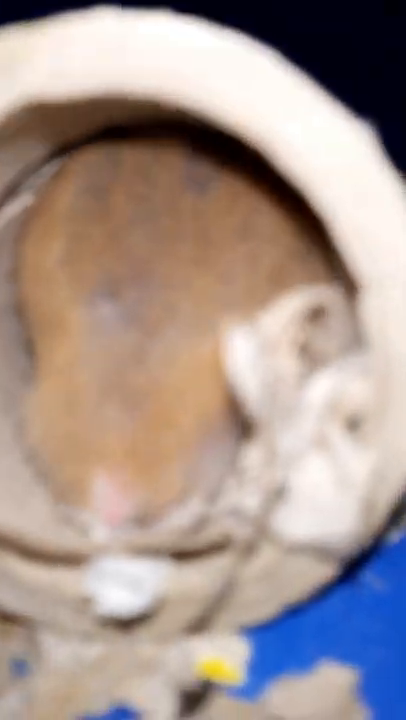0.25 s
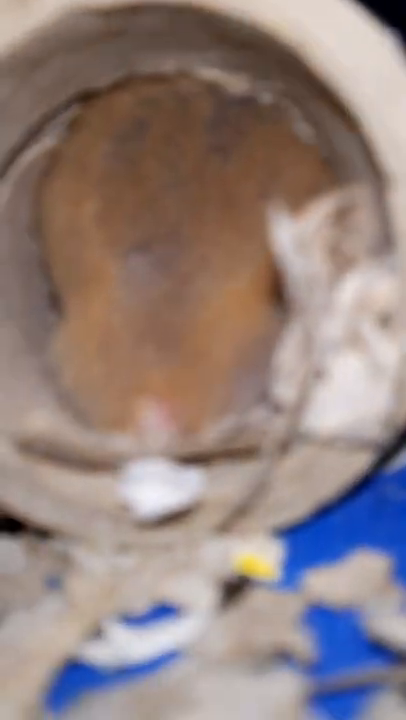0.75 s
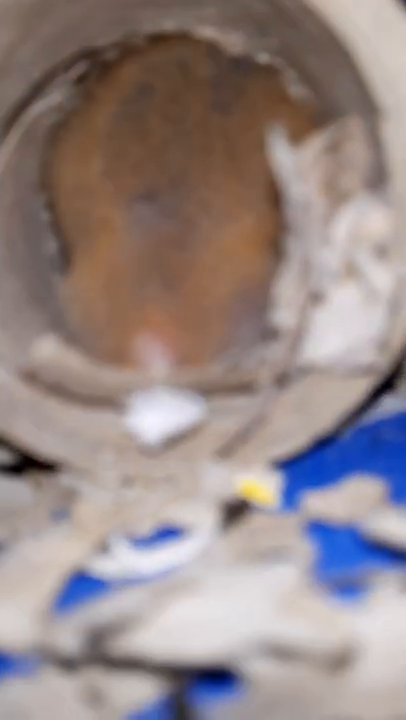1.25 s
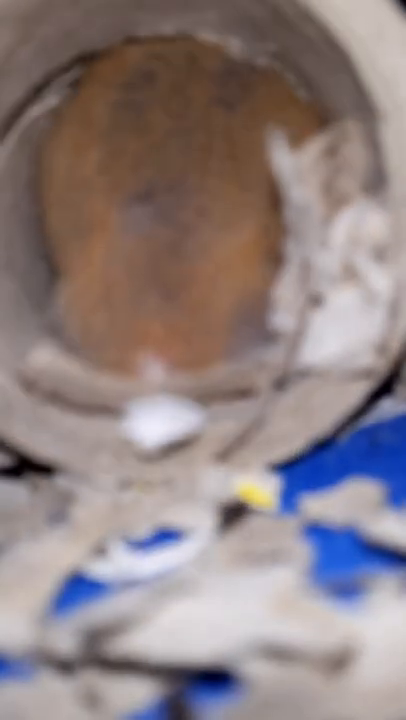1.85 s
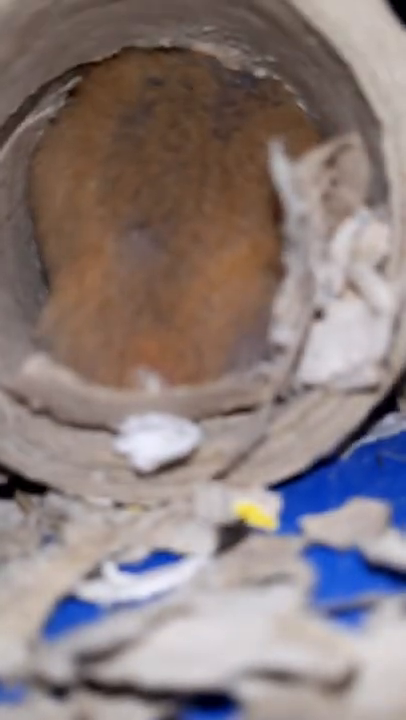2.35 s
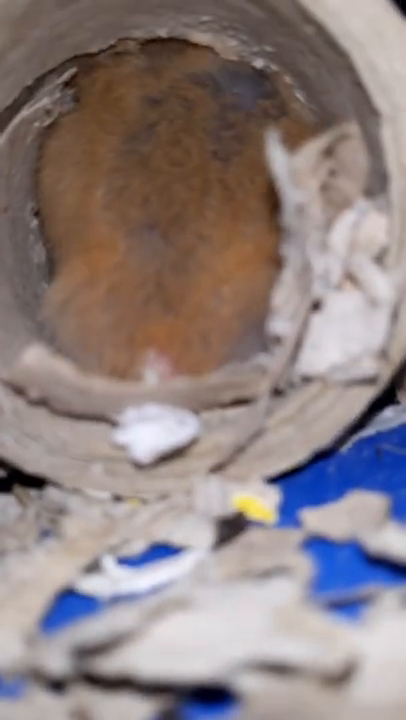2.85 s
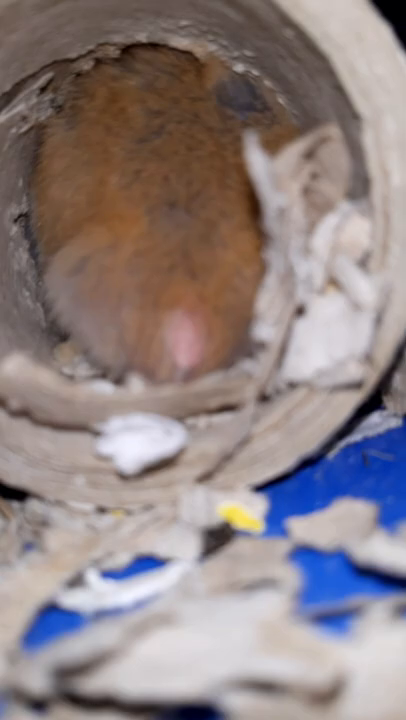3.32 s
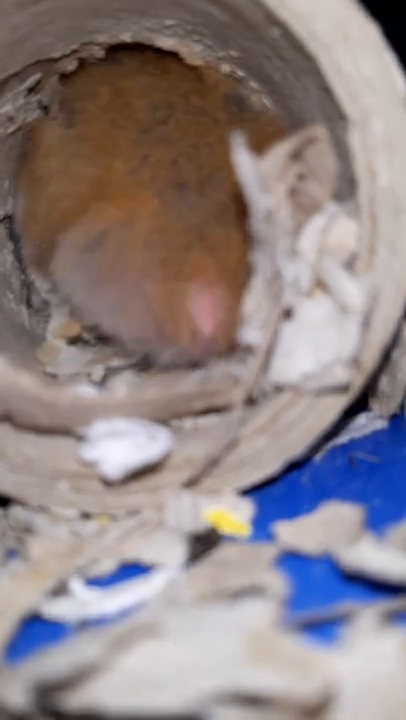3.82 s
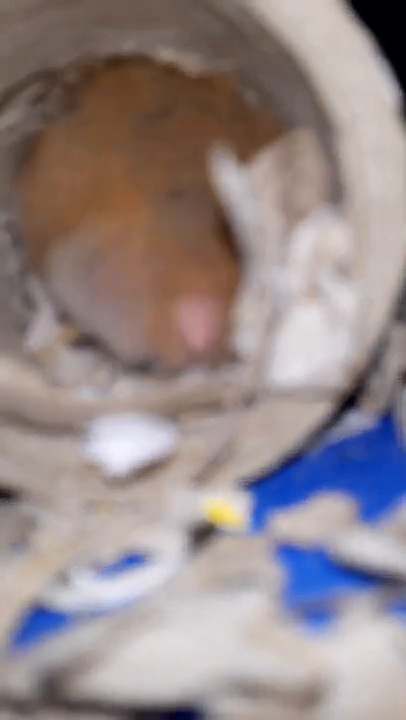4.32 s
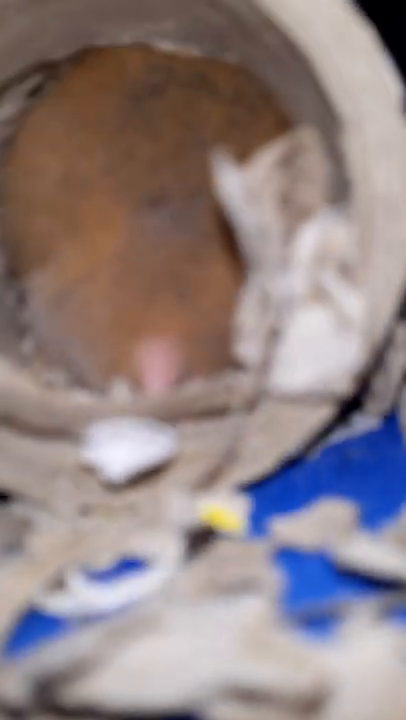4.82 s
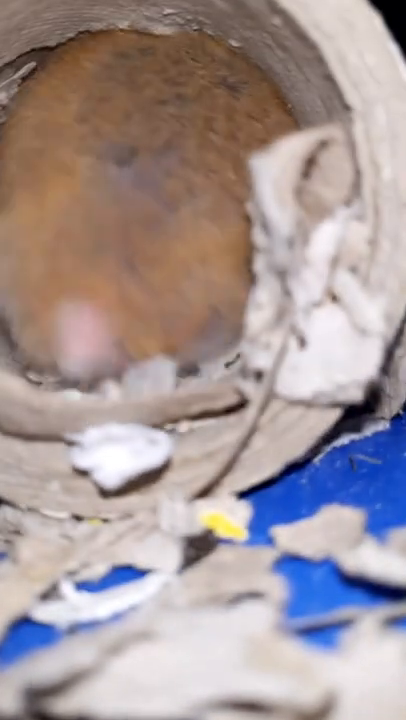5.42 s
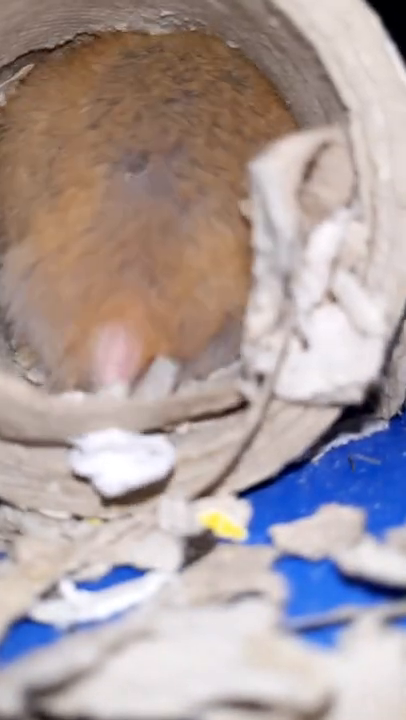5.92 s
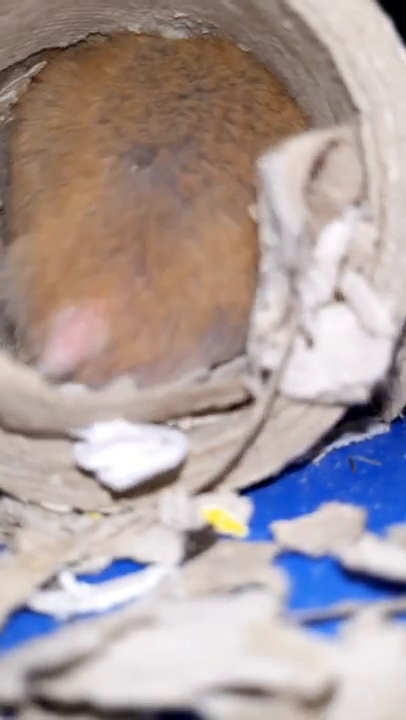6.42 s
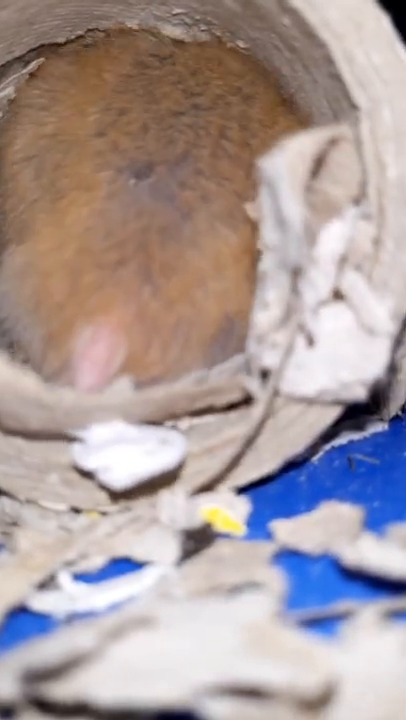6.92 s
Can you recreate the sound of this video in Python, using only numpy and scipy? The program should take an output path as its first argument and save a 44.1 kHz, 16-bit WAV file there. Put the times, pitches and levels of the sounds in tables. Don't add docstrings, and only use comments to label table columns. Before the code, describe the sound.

Bursts of papery rustling, claw taps and soft tube knocks from a burrowing rodent, easing into lighter scuffs over faint room hiss.

```python
import sys
import numpy as np
from scipy import signal
from scipy.fft import rfft, irfft, next_fast_len
from scipy.io import wavfile
from scipy.ndimage import uniform_filter1d

SR = 44100
rng = np.random.default_rng(int(sys.argv[2]) if len(sys.argv) > 2 else 0)


def wav_record(signal):
    frames = np.transpose(np.atleast_2d(signal))
    bounded = np.clip(frames, -1, 1)
    quanta = np.round(bounded * 32767).astype(np.int16)
    wavfile.write(sys.argv[1], SR, quanta)


def gain_from_db(level_db):
    decades = np.asarray(level_db, float) / 20
    return 10 ** decades


N = 315756

# (time [s], effort [dB])
LEANING = [(0.0, -103), (0.4, -84), (0.75, -74), (1.1, -79), (1.5, -84), (1.85, -72.5), (2.15, -64),
           (2.45, -70.5), (2.7, -62.5), (3.15, -63), (3.43, -61), (3.85, -76.5), (4.23, -64), (4.7, -86.5),
           (5.3, -80), (5.82, -69), (6.2, -75), (7.16, -68.5)]
# (frequency [Hz], width [Hz], level [dB])
WALL_MODES = [(197.4, 20.8, -9), (277.5, 21.8, -0.5), (363, 580, 3.5), (627.7, 25.5, -16)]
# (frequency [Hz], width [Hz], level [dB])
FLOOR_MODES = [(88.6, 52, -3.5), (139.4, 34, 3.5)]
# (frequency [Hz], width [Hz], level [dB])
BORE_MODES = [(630, 200, -10), (912, 47, -11), (1063, 101, 2), (1108, 45.6, 1), (1255.6, 34.5, -9.5),
              (1962, 44, -17)]
# (frequency [Hz], width [Hz], level [dB])
TRAY_MODES = [(321, 41, 5.5), (566, 120, 5), (634, 25, -3.5), (860, 290, 10.5), (986, 75, -4),
              (1294, 31, -14), (1930, 84, -31), (3040, 8100, -40)]


def evened(x):
    return x / np.sqrt(np.mean(x ** 2) + 1e-20)


def peak(x, db):
    return gain_from_db(db) * x / abs(x).max()


def read(points, hz):
    f, value = np.transpose(points)
    return np.interp(np.log(hz + 1), np.log(f + 1), value)


def add(mix, s, sound):
    start = round(s * SR)
    part = mix[..., start:start + sound.shape[-1]]
    part += sound[..., :part.shape[-1]]


def effort(rows, column):
    rows = np.vstack(rows)
    return gain_from_db(np.interp(np.arange(N) / SR, rows[:, 0], rows[:, column]))


def swell(s, db, rise, fade):
    coarse = np.arange(0, N, 32)
    since = coarse / SR - np.c_[s]
    slope = np.maximum(-since / np.c_[rise], since / np.c_[fade])
    gain = gain_from_db(np.c_[db] - 30 * slope).sum(0)
    return np.interp(np.arange(N), coarse, gain)


def strokes(column):
    # (time [s], paper [dB], fur [dB], fade [s])
    raking = [(0.0, -80.5, -100, 0.82), (0.62, -64.5, -49.5, 0.16), (0.815, -52, -46, 0.072),
              (1.3, -72, -107, 0.45), (2.019, -54.5, -56, 0.098), (2.84, -60.5, -62, 0.14),
              (2.985, -54.5, -61.5, 0.17), (3.4, -52.5, -56, 0.19), (3.7, -73, -68.5, 0.23),
              (3.94, -64.5, -64.5, 0.31), (4.221, -64, -64, 0.47), (4.545, -62.5, -65, 0.18),
              (4.731, -65.5, -71.5, 0.04), (5.188, -51, -46.5, 0.12), (5.461, -68, -61, 0.13),
              (5.81, -67, -62, 0.15), (6.378, -65.5, -67, 0.41), (7.137, -63.5, -63, 0.19)]
    # (time [s], paper [dB], fur [dB], fade [s], rise [s])
    kicking = [(0.408, -61, -48.5, 0.058, 0.014), (0.581, -49, -51, 0.022, 0.056),
               (0.928, -50.5, -49, 0.077, 0.013), (1.37, -51, -56.5, 0.073, 0.041),
               (1.671, -67, -57, 0.13, 0.0088), (2.13, -49.5, -57, 0.13, 0.04),
               (2.282, -41.5, -45.5, 0.094, 0.026), (2.5, -54, -57.5, 0.24, 0.04),
               (2.909, -72, -47, 0.0065, 0.0055), (3.153, -53.5, -59, 0.2, 0.034),
               (3.728, -54.5, -58.5, 0.072, 0.047), (4.159, -48.5, -43, 0.075, 0.0043),
               (5.718, -79, -62.5, 0.021, 0.0072), (5.85, -88, -69, 0.026, 0.024),
               (6.331, -70, -67, 0.28, 0.018), (6.033, -53.5, -52.5, .035, 0.017),
               (6.08, -46, -48.5, 0.057, 0.023), (6.709, -57, -42, 0.061, 0.0028),
               (6.888, -61, -61, 0.11, 0.0043)]
    rakes, kicks = np.transpose(raking), np.transpose(kicking)
    return (swell(rakes[0], rakes[column], 0.88 * rakes[3], rakes[3])
            + swell(kicks[0], kicks[column], kicks[4], kicks[3]))


def ring(x, modes):
    t = np.arange(3000) / SR
    body = 0
    for k, (hz, width, db) in enumerate(modes):
        decay = gain_from_db(db) * np.exp(-np.pi * width * t)
        body = body + (-1) ** k * decay * np.sin(2 * np.pi * hz * t)
    return signal.oaconvolve(x, body)


def grains(per_s, spread_db):
    size = gain_from_db(spread_db * np.minimum(rng.exponential(1, N), 4)) * rng.choice([-1., 1.], N)
    return size * (rng.random(N) < per_s / SR)


def blow(seconds, rough):
    t = np.arange(800) / SR / seconds
    return t * np.exp(1 - t) * (1 - rough + rough * rng.standard_normal(800))


def grit(seconds):
    return rng.standard_normal(1500) * np.exp(-np.arange(1500) / SR / seconds)


def wall():
    # (time [s], level [dB])
    thumps = [(0.53, -34), (0.546, -39), (0.5798, -30), (0.631, -15.5), (0.793, -31.5), (0.837, -27.5),
              (1.368, -57), (1.386, -40.5), (1.88, -41), (1.957, -38), (2.024, -27.5), (2.131, -38),
              (2.276, -31.5), (2.294, -20), (2.312, -34), (2.504, -33), (2.532, -35.5), (2.569, -42.5),
              (2.909, -29.5), (2.956, -36.5), (2.985, -44), (3.152, -32.5), (3.396, -30), (3.727, -33.5),
              (5.186, -38.5), (5.23, -36), (5.399, -48), (5.467, -34.5), (5.479, -52), (5.517, -54),
              (5.67, -49.5), (5.711, -43.5), (5.819, -42), (6.03, -45), (6.287, -44), (6.336, -39.5),
              (6.725, -44), (6.901, -41)]
    # (time [s], level [dB])
    shoves = [(0.365, -33.5), (0.406, -31.5), (0.516, -34), (0.738, -39), (0.919, -25), (0.949, -57),
              (1.844, -42.5), (2.085, -32.5), (2.15, -35), (2.492, -26), (2.708, -42), (2.764, -38),
              (3.129, -35.5), (3.324, -35.5), (3.349, -33.5), (3.478, -39.5), (3.619, -41.5),
              (3.677, -39.5), (3.878, -44), (4.08, -42.5), (4.104, -37.5), (4.155, -65), (4.308, -39),
              (4.88, -54.5), (4.932, -56), (5.968, -48), (6.085, -32.5), (6.385, -37.5), (6.712, -33),
              (6.8879, -31.5)]
    # (time [s], level [dB], fade [s])
    heaves = [(0.42, -55, 0.079), (0.761, -52, 0.18), (2.098, -59.5, 0.72), (3.36, -51, 0.13),
              (4.098, -59, 0.033), (4.33, -50.5, 0.15), (4.549, -69, 0.2), (4.9, -66.5, 0.063),
              (5.0, -64, 0.11), (5.518, -72, 0.094), (5.969, -61, 0.068), (6.15, -69, 0.17),
              (6.4, -55, 0.12), (6.731, -51, 0.043), (6.83, -53.5, 0.047), (6.91, -45, 0.048),
              (7.0, -71, 0.12)]
    drive = uniform_filter1d(grains(900, 2.88), 24)
    s, db = np.transpose(thumps + shoves)
    push = effort(LEANING, 1) + gain_from_db(-3) * strokes(2)
    push += swell(s, db - 18.5, 0.006, 0.064)
    cardboard = gain_from_db(2.5) * evened(ring(drive, WALL_MODES)[:N])
    floor = gain_from_db(-5.5) * evened(ring(drive, FLOOR_MODES)[:N])
    out = push * (cardboard + floor)

    s, db, fade = np.transpose(heaves)
    shifting = uniform_filter1d(grains(400, 0.81), 200)
    out += swell(s, db, fade, fade) * evened(ring(shifting, FLOOR_MODES)[:N])

    for rows, weight_db in (thumps, -24.5), (shoves, -13):
        for s, db in rows:
            grind = uniform_filter1d(blow(0.0045, 0.76) + 30 * np.gradient(blow(0.0011, 0)), 30)
            floor_db = 0.75 * (db + 35.5) - 34.5 + weight_db
            hit = peak(ring(grind, WALL_MODES), db - 3.5)
            add(out, s - .0012, hit + peak(ring(grind - grind.mean(), FLOOR_MODES), floor_db))
    return out


def claws():
    # (frequency [Hz], width [Hz], level [dB])
    mouth = [(1780, 650, -7), (2767, 255, -0.5), (2956, 233, -1), (3240, 370, -6.5), (6200, 93, -21.5)]
    # (frequency [Hz], width [Hz], level [dB])
    thud = [(487, 83, -11), (1810, 340, -6)]
    # (time [s], level [dB])
    knocks = [(0.4065, -39.5), (0.781, -45), (0.811, -30), (0.917, -44), (0.931, -39), (1.167, -52),
              (1.879, -51), (2.011, -49), (2.025, -34.5), (2.122, -39.5), (2.136, -37), (2.167, -41.5),
              (2.18, -47), (2.294, -25.5), (2.312, -34.5), (2.496, -39), (2.511, -33), (2.55, -43.5),
              (2.9835, -39), (3.149, -38.5), (3.37, -43), (3.785, -48), (4.118, -42), (5.598, -51.5),
              (6.709, -36), (6.714, -45), (6.897, -45)]
    # (time [s], level [dB])
    taps = [(0.5786, -23), (0.631, -17.5), (1.366, -68), (2.275, -31.5), (2.801, -50), (3.392, -33),
            (3.669, -49.5), (3.729, -35), (3.879, -46.5), (4.163, -32.5), (4.259, -46.5), (4.556, -42),
            (5.15, -47.5), (5.189, -39), (5.384, -52), (6.035, -56), (6.089, -51), (6.352, -57),
            (6.389, -58), (6.889, -47.5)]
    scrape = gain_from_db(-5) * effort(LEANING, 1) + gain_from_db(-1.5) * strokes(2)
    out = scrape * evened(ring(grains(2000, 2.4), BORE_MODES)[:N])
    out += strokes(2) * gain_from_db(-3.0) * evened(ring(grains(4000, 5.3), mouth)[:N])
    for rows, hard_db in (knocks, -13), (taps, -2.5):
        for s, db in rows:
            touch = np.pad(blow(.00006, 0), (0, 700), "edge")
            contact = grit(.0012) + .4 * grit(.012) + 3 * touch
            inside = peak(ring(contact, BORE_MODES + thud), db)
            add(out, s - .001, inside + peak(ring(contact, mouth), db + hard_db))
    return out


def paper():
    # (frequency [Hz], density [dB per Hz])
    spectrum = [(1500, 0), (2200, -19), (4300, -9), (6000, -6.5), (8300, -0.5), (10000, -4.5), (11700, -26),
                (14000, -9), (15400, -16), (15850, -43.5)]
    # (time [s], level [dB], length [s])
    swishes = [
        (1.16, -62, 0.028),
        (1.27, -71, 0.02),
        (1.501, -68, 0.028),
        (2.124, -63, 0.022),
        (2.779, -56.5, 0.034),
        (3.688, -57, 0.0078),
        (3.886, -63, 0.026),
        (5.528, -67.5, 0.012),
        (5.869, -69.5, 0.12),
    ]
    # (time [s], level [dB])
    snaps = [(0.4025, -45), (0.5788, -22), (0.629, -29), (0.7856, -43), (0.8165, -34.5), (0.9163, -47),
             (0.9308, -38), (2.0088, -35), (2.0238, -35.5), (2.1206, -38.5), (2.2707, -31.5),
             (2.2902, -38.5), (2.2967, -22.5), (2.3094, -39), (2.4907, -37.5), (2.5057, -37.5),
             (2.8035, -35.5), (2.8848, -32.5), (2.9024, -37.5), (3.3842, -23.5), (3.7279, -38.5),
             (4.5526, -31), (5.1452, -44), (5.1627, -41.5), (6.0831, -30.5), (6.349, -40)]
    # (time [s], level [dB])
    fibres = [(1.3578, -40), (1.365, -36), (1.6745, -55), (2.1384, -37), (2.1535, -37), (2.1784, -39),
              (2.1854, -35), (2.1984, -53), (2.9831, -33.5), (3.0054, -42), (3.1482, -31.5),
              (3.2076, -37.5), (3.256, -42), (3.4044, -28.5), (3.4531, -36.5), (3.6661, -42), (4.1609, -28),
              (4.5406, -45), (5.7129, -48), (6.0102, -54), (6.0277, -39.5), (6.0661, -42), (6.4283, -47),
              (6.7077, -39.5), (6.8867, -37), (7.1227, -52)]
    # (time [s], level [dB], pitch [Hz])
    flicks = [(0.5132, -55, 7660), (0.5325, -45, 6000), (0.778, -38, 6700), (0.936, -30.5, 6200),
              (1.086, -46, 9350), (1.275, -43, 8160), (1.3354, -53, 7110), (1.35, -41.5, 8900),
              (1.475, -64.5, 8560), (1.8775, -43, 8480), (1.9614, -58, 8320), (1.9779, -44, 8550),
              (2.085, -41, 8490), (2.354, -60, 8800), (2.7142, -55, 8110), (2.7263, -39.5, 8950),
              (2.7531, -45, 8110), (2.7574, -41, 8620), (2.9292, -40, 6740), (3.031, -48, 8900),
              (3.1864, -55, 8340), (3.3228, -57, 8660), (3.3653, -56, 7580), (3.51, -42, 8450),
              (3.671, -33, 9670), (3.7808, -51.5, 7710), (3.876, -43, 8450), (3.899, -47, 9640),
              (3.935, -39, 8480), (4.0896, -54, 8570), (4.2288, -45, 8680), (4.2877, -39, 9250),
              (4.3166, -49, 7640), (4.329, -43, 7300), (4.466, -45.5, 8290), (4.5056, -53, 9450),
              (4.8755, -56.5, 7990), (5.0893, -50, 6220), (5.1322, -49, 6140), (5.2195, -40, 6400),
              (5.3238, -51.5, 6090), (5.4151, -52, 8150), (5.4635, -49, 10100), (5.565, -49.5, 8300),
              (5.7478, -46, 7960), (5.803, -42, 8300), (5.858, -43, 6800), (5.8875, -58, 7810),
              (5.9594, -50.5, 8050), (6.283, -43, 6100), (6.325, -46, 6040), (6.3887, -41, 6000),
              (7.0632, -51, 8360)]
    size, t = next_fast_len(N), np.arange(N) / SR
    crackle = grains(7000, 4.2) + 2.0 * rng.standard_normal(N)
    clumps = gain_from_db(3.6 * evened(uniform_filter1d(rng.standard_normal(N), 450)))
    strays = signal.oaconvolve(grains(450, 5.5), grit(0.0004))[:N]
    bed = evened(crackle * clumps) + gain_from_db(-4.5) * evened(strays)
    colour = gain_from_db(read(spectrum, np.fft.rfftfreq(size, 1 / SR)))
    stir = strokes(1) * gain_from_db(1.0)
    for s, db, length in swishes:
        stir += gain_from_db(db) * np.exp(-((t - s) / length) ** 2)
    out = evened(irfft(rfft(bed, size) * colour, size)[:N]) * stir

    for rows, pitch_hz in (snaps, 6950), (fibres, 8480):
        band = signal.butter(2, [.6 * pitch_hz, 1.35 * pitch_hz], "band", fs=SR)
        for s, db in rows:
            tear = grit(0.00054) + 0.46 * grit(0.0022)
            add(out, s - .0005, peak(signal.lfilter(*band, tear) + 0.36 * tear, db + 0.5))
    for s, db, pitch_hz in flicks:
        band = signal.butter(2, [.72 * pitch_hz, 1.45 * pitch_hz], "band", fs=SR)
        add(out, s, peak(signal.lfilter(*band, grit(0.00068)), db - 3.0))
    return out


def brush():
    # (time [s], level [dB], rise [s], fade [s])
    brushes = [(.41, -60, .02, 0.082), (.572, -56, .05, .02), (.582, -46.5, .004, 0.077),
               (.633, -51, .004, 0.072), (.812, -56, .07, 0.084), (.935, -54.5, 0.024, 0.07),
               (1.678, -59.5, 0.0044, 0.091), (2.03, -60, .03, .08), (5.46, -71, 0.042, 0.07),
               (5.82, -68.5, .08, .08), (2.3, -50, .04, 0.089), (3.39, -63, 0.027, 0.064),
               (3.68, -65.5, .03, 0.18), (6.17, -64.5, 0.098, .08), (6.37, -70, 0.12, 0.12)]
    # (time [s], level [dB], rise [s], fade [s])
    scuffs = [
        (4.93, -58.5, 0.1, 0.18),
        (5.05, -67.5, .05, .2),
        (5.85, -59, .15, .15),
        (6.83, -62, .04, .12),
    ]
    band = signal.butter(2, [1290, 6000], "band", fs=SR)
    card = signal.lfilter(*band, grains(2500, 4.0))
    belly = ring(uniform_filter1d(grains(700, 5.0), 24), WALL_MODES)[:N]
    return swell(*np.transpose(brushes)) * evened(card) + swell(*np.transpose(scuffs)) * evened(belly)


def nicks():
    # (time [s], level [dB], pitch [Hz])
    contacts = [(1.9969, -53, 6480), (2.0837, -52, 2850), (2.1244, -50, 6290), (2.154, -45, 6290),
                (2.5104, -31, 2770), (2.7588, -51, 3990), (2.7634, -53, 5920), (2.7706, -44, 5900),
                (2.8524, -55, 6350), (2.9773, -46, 6290), (2.9814, -51, 2900), (3.3653, -50, 6200),
                (3.6666, -63, 2740), (3.6711, -58, 3110), (3.7045, -52, 3000), (3.7808, -59, 2810),
                (3.8754, -53, 3060), (3.8995, -54, 3070), (3.9407, -61, 2920), (3.9589, -56, 2910),
                (4.0864, -50, 3080), (4.2554, -43, 2910), (5.145, -38, 2810), (5.164, -38, 2800),
                (5.2195, -44, 2860), (5.3797, -57, 2960), (5.4156, -49, 2950), (5.4244, -64, 2580)]
    out = np.zeros(N)
    for s, db, pitch_hz in contacts:
        contact = grit(0.00041) + 0.247 * grit(0.004)
        spot = ring(contact, [(pitch_hz, 290, 0), (1955, 60, -16)])[:1500]
        add(out, s, peak(spot + 0.6 * contact, db - 4.5))
    return out


def pings():
    # (time [s], level [dB])
    raps = [
        (2.984, -49),
        (3.73, -38.5),
        (4.166, -36.5),
        (5.386, -54.5),
        (5.808, -53),
        (6.712, -32),
        (6.893, -43),
    ]
    out = np.zeros(N)
    for s, db in raps:
        contact = blow(0.00011, 0.2) + 0.17 * blow(0.0024, 0.88)
        add(out, s, peak(ring(contact, BORE_MODES[1:5]), db))
    return out


def glide():
    # (time [s], pitch [Hz], level [dB])
    path = [
        (4.88, 2340, -91),
        (4.93, 2350, -74.5),
        (5.01, 2400, -83),
        (5.06, 2850, -73.5),
        (5.2, 2830, -60),
        (5.28, 2650, -71.5),
        (5.37, 2530, -70.5),
        (5.53, 2480, -75),
        (5.6, 2440, -88),
    ]
    s, hz, db = np.transpose(path)
    t = np.arange(N) / SR
    flutter = uniform_filter1d(rng.standard_normal((2, N)), 150)
    turn = 2 * np.pi * np.cumsum(np.interp(t, s, hz)) / SR
    rub = flutter[0] * np.cos(turn) + flutter[1] * np.sin(turn)
    return gain_from_db(np.interp(t, s, db)) * evened(rub)


def skid(db):
    t = np.arange(4499) / SR
    hz = 856 + (1200 - 856) * np.exp(-t / 0.005)
    return gain_from_db(db) * np.exp(-t / 0.0034) * np.sin(2 * np.pi * np.cumsum(hz) / SR)


def tray():
    # (time [s], level [dB], left-right [dB], grind [s])
    bumps = [
        (1.674, -22.5, -0.5, 0.00028),
        (1.6775, -17, 2.5, 0.0003),
        (1.704, -35, 4.5, 0.000058),
        (1.738, -49, 3, 0.00033),
    ]
    # (time [s], level [dB])
    ticks = [
        (2.6118, -35.5),
        (2.8316, -34),
        (2.8851, -33),
    ]
    # (frequency [Hz], width [Hz], level [dB])
    rim = [(620, 63, -3), (787, 74, -6), (963, 67, 2), (1237, 90, -5.5), (1550, 230, -9.5)]
    # (time [s], level [dB], left-right [dB], push [s], rebound [s])
    crack = (2.90574, -3.6, -19, .0003, .0006)
    out = np.zeros((2, N))
    for s, db, pan_db, grind in bumps:
        hit = blow(grind, 0.5) - 0.31 * blow(3 * grind, 0.75) + 0.073 * blow(0.0058, 0.89)
        pan = gain_from_db(pan_db * np.array([[.5], [-.5]]))
        weight = ring(blow(0.0008, 0), FLOOR_MODES[1:] + [(179, 32, 6.9)])
        add(out, s, pan * peak(ring(hit, TRAY_MODES), db) + peak(weight, db - 16.5))

    rap = np.exp(-((np.arange(1500) / SR - .0003) / .0001) ** 2)
    for s, db in ticks:
        contact = rap + 0.1 * grit(0.0015) + 0.2 * grit(.016)
        tick = peak(ring(contact, rim), db) + skid(db - 6.5)
        add(out, s, gain_from_db(np.array([[-3.5], [3.5]])) * tick)

    s, db, pan_db, push, rebound = crack
    t = np.arange(400) / SR
    pulse = np.sin(np.pi * np.clip(t / push, 0, 1))
    pulse -= .75 * np.sin(np.pi * np.clip((t - push) / rebound, 0, 1)) ** 0.708
    pulse += 0.17 * np.sin(np.pi * np.clip((t - .0014) / 0.0012, 0, 1))
    pulse += 0.36 * rng.standard_normal(400) * gain_from_db(-60 * t / 0.002)
    pulse += .035 * rng.standard_normal(400) * gain_from_db(-60 * t / 0.009)
    add(out[1], s, gain_from_db(db) * pulse)
    add(out[0], s + .0002, peak(np.diff(pulse), db + pan_db))
    add(out[0], s + 0.0023, peak(ring(pulse, BORE_MODES), db + pan_db - 7.0))
    return out


def drag():
    # (time [s], thin edge [dB], floor [dB], rise [s], fade [s])
    drags = [
        (1.652, -50, -62, .012, 0.069),
        (1.69, -51, -62.5, .01, .04),
        (1.714, -45.5, -55, .012, .03),
        (1.74, -62, -53, .02, 0.031),
        (1.77, -69, -60, .03, .07),
    ]
    # (frequency [Hz], width [Hz], level [dB])
    edge = [(570, 70, 1.5), (880, 160, -8), (1310, 60, -13.5)]
    s, edge_db, floor_db, rise, fade = np.transpose(drags)
    edge_rub = evened(ring(grains(1500, 2.7), edge)[:N])
    floor_rub = evened(ring(rng.standard_normal(N), TRAY_MODES[:1])[:N])
    return swell(s, edge_db, rise, fade) * edge_rub + swell(s, floor_db, rise, fade) * floor_rub


def sway(x):
    t = np.arange(N) / SR
    shift = 0
    for f in np.geomspace(.3, 2.5, num=6):
        shift = shift + np.sin(2 * np.pi * (f * t + rng.random())) / (2 * np.pi * f)
    shift *= 0.012 / np.sqrt(3)
    return np.interp(t + shift, t, x)


def fan():
    # (frequency [Hz], width [Hz], level [dB])
    hum = [(650, 150, 1.5), (766, 11, -6.5), (960, 6.7, 2), (1033, 13, -3), (1135, 11, -3), (1190, 12, -4)]
    gusts = gain_from_db(3.4 * evened(uniform_filter1d(rng.standard_normal(N), 6000)))
    song = ring(rng.standard_normal(N) * gusts, hum)[:N]
    return gain_from_db(-78) * sway(evened(song))


def room():
    # (frequency [Hz], density [dB per Hz])
    tone = [(30, -33), (60, -17), (120, 0), (260, -6.5), (480, -9.5), (640, -13.5), (1000, -5.5),
            (1300, -19), (1650, -18.5), (3200, -19.5), (5000, -24), (8200, -15.5), (11700, -26),
            (14000, -23.5), (15400, -24), (15900, -41)]
    # (frequency [Hz], left-right likeness)
    likeness = [(60, 0.58), (240, 0.063), (950, 0), (3770, 0), (15000, 0.31)]
    frames, hz = N // 256 + 5, np.fft.rfftfreq(1024, 1 / SR)
    a, b, c, d, patches = rng.standard_normal((frames, 513, 5)).T
    patches = evened(uniform_filter1d(uniform_filter1d(patches, 12, 0), 14, 1))
    same = np.clip(read(likeness, hz), -1, 1)[:, None]
    left = a + 1j * b
    z = np.array([left, same * left + np.sqrt(1 - same ** 2) * (c + 1j * d)])
    settle_db = 1.5 * np.exp(-np.arange(frames) * 256 / SR / 0.2) * (hz[:, None] > 3500)
    z *= gain_from_db(read(tone, hz)[:, None] + 0.88 * patches + settle_db)
    hiss = evened(signal.istft(z, nperseg=1024, noverlap=768)[1][:, :N])
    return gain_from_db(-70 + np.array([[1.5], [-1.5]])) * hiss


def ports(x):
    # (frequency [Hz], phase [rad])
    lead = [(0, 0.44), (1000, 0.78), (1640, 3.76), (2760, 4.09), (7000, 13.7), (16000, 16)]
    # (frequency [Hz], left-right [dB])
    tilt = [(60, 6.5), (250, 2.5), (1200, 4.5), (2500, 1), (8000, 6.5)]
    # (frequency [Hz], share)
    alike = [(60, .85), (300, .94), (1000, .7), (4000, .45), (12000, .3)]
    size = next_fast_len(N + 2048)
    hz = np.fft.rfftfreq(size, 1 / SR)
    turn = 2 * np.pi * 11 * np.arange(N) / SR + 2 * np.pi / 3 * np.arange(3)[:, None]
    tails = rng.standard_normal((3, 700)) * gain_from_db(-60 * np.arange(700) / SR / 0.02)
    tails /= np.linalg.norm(tails, axis=1, keepdims=True)
    scattered = signal.oaconvolve(x * np.sqrt(2 / 3) * np.cos(turn), tails, axes=1).sum(0)
    same = np.clip(read(alike, hz), 0, 1)
    direct = rfft(x, size)
    late = same * direct * np.exp(-1j * np.interp(hz, *np.transpose(lead)))
    late += np.sqrt(1 - same ** 2) * rfft(scattered, size)
    half = gain_from_db(read(tilt, hz) / 2)
    return irfft(np.array([direct * half, late / half]), size)[:, :N]


def scene():
    # (time [s], paper left-right [dB])
    crossing = [
        (0, -29),
        (1.2, -1.5),
        (2.9, -6.5),
        (4, -1),
        (6, 2),
        (7.16, 5.5),
    ]
    across = effort(crossing, 1) ** np.array([[.5], [-.5]])
    tube = ports(wall() + claws() + glide())
    bedding = across * ports(paper())
    small_contacts = ports(pings() + nicks() + brush())
    return tube + bedding + small_contacts + tray() + drag() + room() + fan()


def low_pass(x):
    return signal.sosfilt(signal.butter(12, 16670, fs=SR, output="sos"), x)


def record(dry):
    thin = signal.sosfilt(signal.butter(3, 70, "high", fs=SR, output="sos"), dry)
    thin = signal.oaconvolve(thin, signal.firwin(255, 16450, fs=SR)[None], "same")
    return low_pass(thin)


dry = scene()
out = record(dry)
wav_record(out)
```